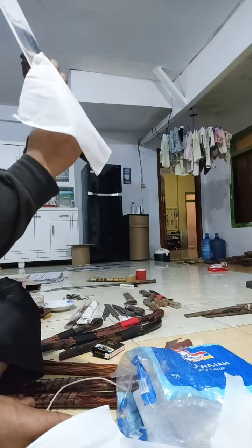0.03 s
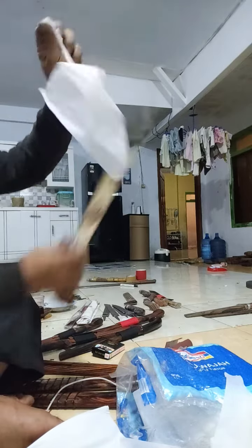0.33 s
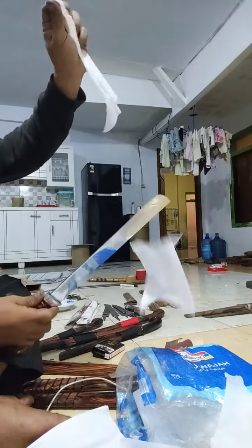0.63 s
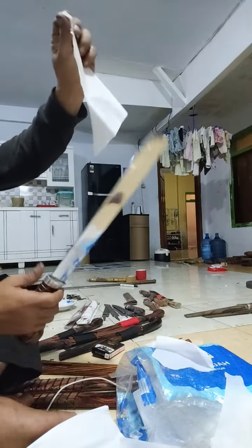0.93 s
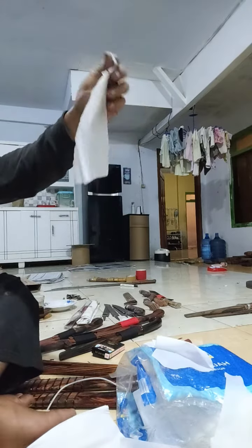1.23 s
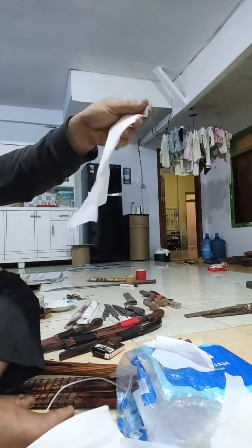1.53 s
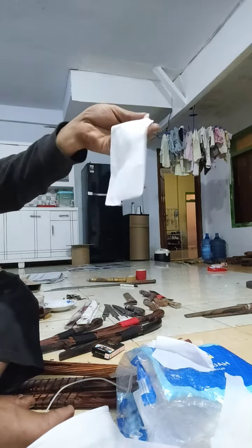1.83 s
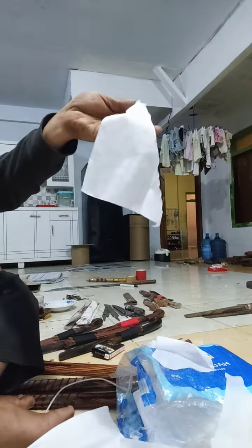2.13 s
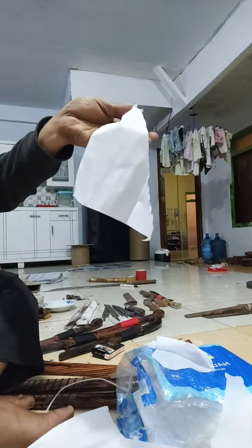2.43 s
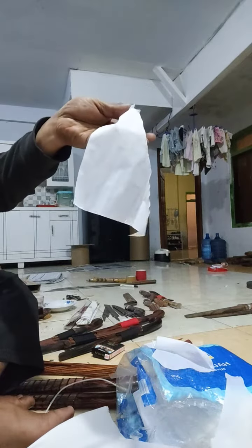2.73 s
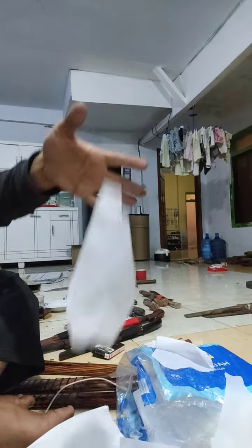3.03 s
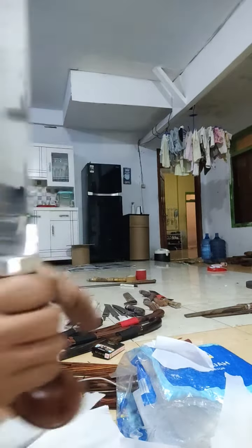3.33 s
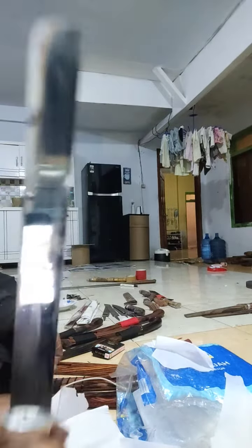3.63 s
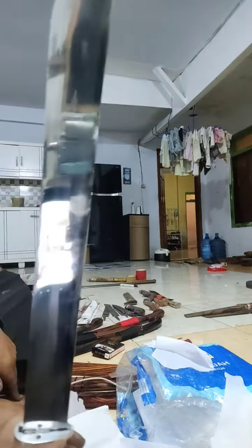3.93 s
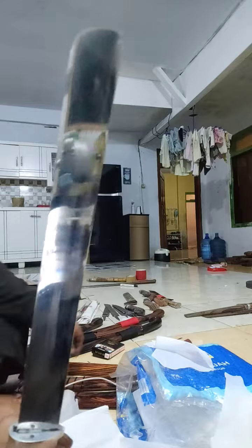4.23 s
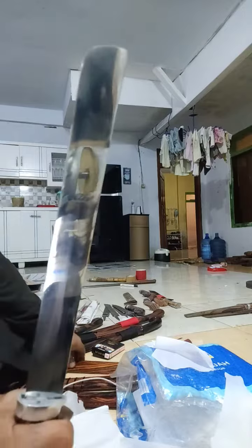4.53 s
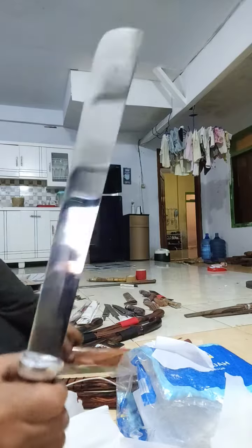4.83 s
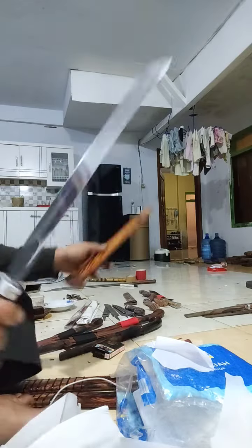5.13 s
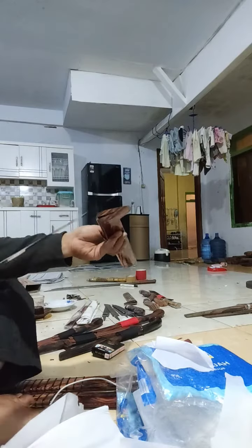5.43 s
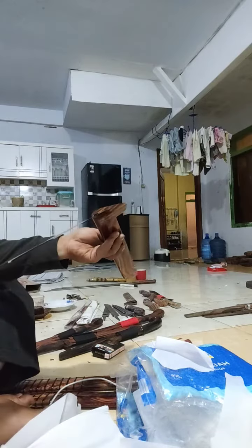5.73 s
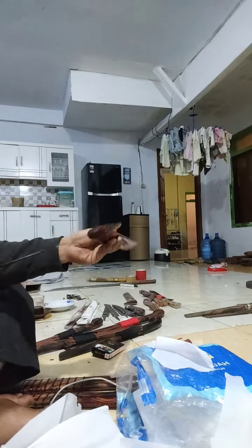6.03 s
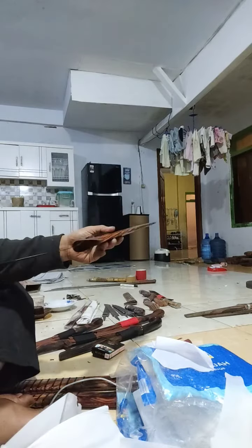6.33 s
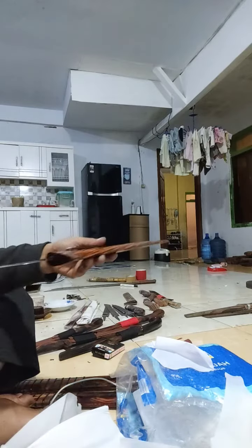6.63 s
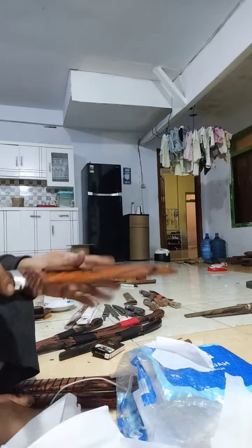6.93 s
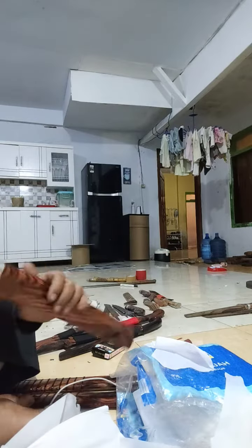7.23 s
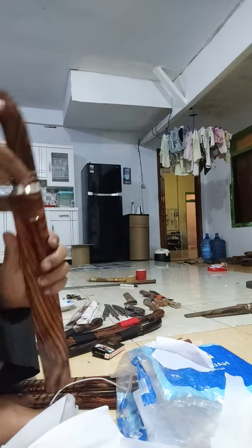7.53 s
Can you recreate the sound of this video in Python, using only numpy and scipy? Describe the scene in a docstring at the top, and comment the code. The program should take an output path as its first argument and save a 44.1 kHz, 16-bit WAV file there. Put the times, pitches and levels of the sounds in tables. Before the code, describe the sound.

A fan hums quietly throughout in a tiled room. At about 0.3 seconds a long knife slices through soft paper with a short, crisp swish, close by. The loose sheet gives faint flicks near 0.6, 0.8, 1.5 and 3.3 seconds, while a sleeve rustles softly, swelling a little between 3.8 and 5 seconds. Hands bump a wooden sheath with dull knocks at about 4.5, 5 and 5.2 seconds, followed by a very faint, thin squeak. From 5.7 seconds the steel blade taps the sheath's mouth with dry, light ticks that come closer together as it rasps inside from about 6.4 seconds. At 6.8 seconds the hilt seats with one sharp wooden clack, by far the loudest sound, echoing for about half a second. A few faint ticks and a soft bump follow between 7.2 and 7.6 seconds.

```python
"""Cutting paper and sheathing a knife

A long knife slices a hanging sheet of soft paper, snapping its fibres, while a sleeve rustles.
Hands bump the wooden sheath; the steel taps at its mouth, rasps in and seats with a sharp clack
that rings the wood. A tiled room echoes it all, and a fan hums in the background."""
import sys
import numpy as np
from scipy import signal
from scipy.fft import rfft, irfft
from scipy.io import wavfile
from scipy.ndimage import uniform_filter1d

SR = 44100
rng = np.random.default_rng(int(sys.argv[2]) if len(sys.argv) > 2 else 0)


def put_to_file(sound):
    """Save the sound as 16-bit audio at rate SR, in the file named by the first command-line argument."""
    columns = np.atleast_2d(sound).T  # one column per channel
    safe = np.clip(columns, -1, 1)
    whole_steps = np.round(safe * 32767)
    wavfile.write(sys.argv[1], SR, whole_steps.astype(np.int16))


N = 343980
T = np.arange(N) / SR

# light knocks of steel on wood: t/s, level/dB, f/Hz, tick level relative to the knock/dB
TAP_HITS = [(5.6685, -25, 2040, 2.5), (5.6700, -23, 1690, -11), (5.6725, -24.5, 1300, -5),
            (5.9287, -24, 1650, -6), (6.318, -25.5, 1550, -5.5), (6.424, -29.5, 1980, -7),
            (6.435, -30.5, 1100, -22), (6.565, -31.5, 1620, -1), (6.573, -29.5, 1190, -4),
            (6.669, -29.5, 1860, -12), (6.728, -29, 1140, -20.5), (6.752, -31.5, 2360, -1.5),
            (6.783, -33.5, 2730, 2.5), (7.178, -44.5, 7560, 13), (7.467, -32.5, 957, -14),
            (7.477, -34, 1950, -12), (7.532, -37, 1290, -8)]


def undb(db):
    """Turn decibels into a gain."""
    return 10 ** (np.asarray(db) / 20)


def unit(x):
    """Scale a sound to an average (rms) level of 1."""
    return x / np.sqrt(np.mean(x ** 2))


def panned(pan_db):
    """Left and right gains; the left is pan_db louder."""
    return undb(np.array([[pan_db], [-pan_db]]) / 2)


def add(out, s, x):
    """Mix x into out, starting at s seconds."""
    i = int(s * SR)
    out[..., i:i + x.shape[-1]] += x[..., :out.shape[-1] - i]


def curve(rows):
    """A gain that follows rows of t/s, level/dB and is zero outside them."""
    s, db = np.transpose(rows)
    return undb(np.interp(T, s, db)) * (T >= s[0]) * (T <= s[-1])


def stroke(start_s, end_s, attack_s, release_s):
    """Gain of one movement: grows until start_s, holds at 1, dies away after end_s."""
    return np.exp(-np.maximum(start_s - T, 0) / attack_s - np.maximum(T - end_s, 0) / release_s)


def swell(s, width_s):
    """A bell-shaped gain that reaches 1 at s seconds."""
    return np.exp(-((T - s) / width_s) ** 2 / 2)


def decay(t, t60):
    """A fade that drops 60 dB every t60 seconds."""
    return np.exp(-np.log(1000) * t / t60)


def walk(rate):
    """A smooth random wander of size about 1, with rate turns a second."""
    hold = int(SR / rate)
    steps = np.repeat(rng.standard_normal(N // hold + 1), hold)
    return unit(uniform_filter1d(steps, hold)[:N])


def convolve(x, response):
    """Give every sample of x the same ring or echo."""
    return signal.fftconvolve(np.atleast_2d(x), np.atleast_2d(response), axes=1)[:, :x.shape[-1]]


def band(x, kind, hz, order=2):
    """Keep the "low" or the "high" side of a frequency."""
    return signal.sosfilt(signal.butter(order, hz, kind, fs=SR, output="sos"), x)


def colour(x, points, size=4096):
    """Shape the tone along points of f/Hz, level/dB."""
    hz, db = np.transpose(points)
    f = np.maximum(np.fft.rfftfreq(size, 1 / SR), 1)
    gain = undb(np.interp(np.log(f), np.log(hz), db))
    cepstrum = irfft(np.log(gain))
    cepstrum[1:size // 2] *= 2  # folded forward so the filter never rings ahead of the sound
    cepstrum[size // 2 + 1:] = 0
    return convolve(x, irfft(np.exp(rfft(cepstrum))))


def resonance(x, hz, width_hz):
    """Keep a narrow band around one pitch."""
    return signal.lfilter(*signal.iirpeak(hz, hz / width_hz, fs=SR), x)


def diffuse(size, apart_hz=900):
    """Noise from all around: left and right share the bass but not the treble."""
    alike = 0.96 * np.exp(-(np.fft.rfftfreq(size, 1 / SR) / apart_hz) ** 2)
    mid, side = rfft(rng.standard_normal((2, size))) * np.sqrt([1 + alike, 1 - alike]) / np.sqrt(2)
    return irfft([mid + side, mid - side], size)


def grains(rate, spread_db, shared):
    """Tiny snaps of uneven size, partly shared by left and right."""
    snaps = (rng.random((3, N)) < rate / SR) * rng.standard_normal((3, N))
    snaps *= undb(spread_db * rng.standard_normal((3, N)))
    return np.sqrt(shared) * snaps[2] + np.sqrt(1 - shared) * snaps[:2]


def knock(hz, t60):
    """One fading note with an energy of 1."""
    t = T[:SR // 10]
    ring = np.sin(2 * np.pi * hz * t) * decay(t, t60) * (1 - np.exp(-2 * hz * t))
    return ring / np.linalg.norm(ring)


def fan(shaft_hz=75.13, rush_db=-56.5):
    """Spinning blades hum, air rushes, and its swirls make the room boom."""
    # blade tones: multiple of the shaft rate, level/dB
    blade_tones = [(3, -56), (5, -72), (6, -70), (8, -74.5), (9, -72.5), (14, -80.5), (30, -78.5)]
    # a fainter second hum: f/Hz, level/dB
    faint_tones = [(543.7, -82.5), (726.7, -84)]
    # low notes of the room: f/Hz, half-width of each filter/Hz, level before the draught/dB
    room_notes = [(141.3, 4.7, -66), (172.2, 10, -63.5)]
    # the draught raises and lowers the boom: t/s, gain/dB
    draught = [(0, 4.5), (1.8, 3), (2.4, -2.5), (5, -1), (6, -8), (7.8, 1)]
    # tone of rushing air: f/Hz, level/dB
    air_tone = [(18, -70), (30, -44), (107, -11.5), (136, -2), (195, -9), (228, -7.5), (253, -11),
                (374, -13.5), (404, -18), (448, -16.5), (1030, -24), (1110, -26), (2310, -24.5),
                (4780, -35.5), (15000, -41.5)]
    turns = np.cumsum(shaft_hz * (1 + 0.00099 * walk(3))) / SR
    hum = np.zeros(N)
    for k, db in blade_tones:
        hum += undb(db + .5 * walk(5)) * np.sqrt(2) * np.sin(2 * np.pi * (k * turns + rng.random()))
    for hz, db in faint_tones:
        hum += undb(db) * np.sqrt(2) * np.sin(2 * np.pi * hz * T)
    noise = diffuse(N)
    boom = 0
    for hz, half_width, db in room_notes:
        note = resonance(noise, hz, 2 * half_width)
        boom += undb(db) * unit(resonance(note, hz, 2 * half_width))
    # two soft, narrow peaks colour the steady background hiss
    hiss_peaks = unit(resonance(noise, hz=2274, width_hz=130)) * undb(-71)
    hiss_peaks += unit(resonance(noise, hz=1040, width_hz=90)) * undb(-77.5)
    rush = unit(colour(diffuse(N), air_tone)) * undb(rush_db + 0.087 * walk(1.8))
    return hum + boom * curve(draught) + rush + hiss_peaks


def rustle(steady_db=-67):
    """Paper, sleeve and palm brush softly all the time, swelling with each movement."""
    # arm movements: t/s, level/dB, half-width/s
    brushes = [(.02, -64, .06), (2.98, -70, 0.052), (3.83, -65, 0.14), (4.22, -65, 0.12),
               (4.72, -59.5, 0.075), (4.95, -67, .15), (7.6, -71.5, .1)]
    # tone of rubbing cloth: f/Hz, level/dB
    cloth_tone = [(400, -2.5), (1200, -7), (2400, 1), (4500, -9.5), (7000, -10), (10000, -17), (15000, -13)]
    power = undb(steady_db) ** 2 + sum((undb(db) * swell(s, width)) ** 2 for s, db, width in brushes)
    rubbing = colour(grains(rate=7000, spread_db=2.5, shared=.2), cloth_tone)
    return unit(rubbing) * np.sqrt(power) * panned(0.37)


def paper_cut(start_s=0.23, end_s=0.35, cut_db=-50.5, flutter_db=-57):
    """Fibres snap by the thousand as the edge runs through the sheet, which flutters around the cut."""
    # tone of snapping paper: f/Hz, level/dB
    paper_tone = [(300, -8), (700, -3), (1200, -8.5), (1900, -0.5), (2600, -3.5), (4000, -3.5), (5500, -7),
                  (6700, -4.5), (8500, -12), (11000, -11.5), (14000, -7.5), (15500, -11.5)]
    fibres = grains(rate=9000, spread_db=0, shared=0.2) * undb(1.5 * walk(123))
    cutting = undb(cut_db) * stroke(start_s, end_s, attack_s=0.026, release_s=0.007)
    flutter = undb(flutter_db) * swell((start_s + end_s) / 2, width_s=0.11)
    return unit(colour(fibres, paper_tone)) * np.hypot(cutting, flutter) * panned(0.84)


def paper_flicks():
    """The loose sheet flexes and settles in short bright whispers."""
    # flicks of the sheet: t/s, level/dB, half-width/s
    flicks = [(0.59, -57.5, 0.013), (0.797, -66, .012), (1.547, -68, .025), (3.302, -61.5, 0.016)]
    # tone of flexing paper: f/Hz, level/dB
    flick_tone = [(500, 4), (2500, 2), (4500, -3), (6500, 2), (9000, -9), (14000, -0.5)]
    flexing = sum(undb(db) * swell(s, width) for s, db, width in flicks)
    crinkle = colour(grains(rate=1400, spread_db=2.5, shared=.3), flick_tone)
    return unit(crinkle) * flexing * panned(2)


def hand_bumps(t60=0.0094):
    """A hand picks up and grips the sheath; soft flesh stops each knock almost at once."""
    # dull knocks: t/s, level/dB, f/Hz
    bumps = [(4.504, -24.5, 720), (4.516, -34, 1290), (4.996, -20, 420), (5.007, -20, 410),
             (5.012, -31, 780), (5.018, -23.5, 565), (5.152, -24, 384), (7.531, -29, 684)]
    out = np.zeros(N)
    for s, db, hz in bumps:
        add(out, s, undb(db) * knock(hz, t60))
    return out * panned(1.3)


def squeak(middle_s=5.355, half_s=0.135, top_hz=12800, sag_hz_per_s=19000):
    """A very faint, thin squeak rises and falls as the sheath is lifted."""
    away_s = np.minimum(np.abs(T - middle_s), half_s)
    pitch = (top_hz - sag_hz_per_s * away_s) * (1 + .004 * walk(300))
    gain = undb(-76) * (1 - (away_s / half_s) ** 2)
    return np.sin(2 * np.pi * np.cumsum(pitch) / SR) * gain


def blade_taps(wood_t60=0.0097, tick_t60=0.0079, steel_db=-11):
    """The blade knocks on the sheath's mouth and walls: each time a dry note with a steely tick."""
    # tone of the tick: f/Hz, level/dB
    tick_tone = [(500, 3.5), (2000, 6), (3300, 0.5), (6000, -8), (9000, -11.5), (15000, -19)]
    out, t = np.zeros((2, N)), T[:SR // 10]
    steel = undb(steel_db) * (knock(hz=4850, t60=0.06) + 0.39 * knock(hz=5800, t60=0.069))
    for s, db, hz, tick_db in TAP_HITS:
        tick = colour(rng.standard_normal((2, len(t))) * decay(t, tick_t60), tick_tone)
        tick /= np.linalg.norm(tick[0])
        add(out, s, undb(db) * (knock(hz, wood_t60) + undb(tick_db) * (tick + steel)))
    return out * panned(4.2)


def sheath_rasp(slide_db=-55, press_db=-3.5):
    """Steel catches and slips on wood in uneven surges, rubbing harder wherever it knocks a wall."""
    # tone of steel rubbing wood: f/Hz, level/dB
    rasp_tone = [(400, -6), (700, -3.5), (1100, -1.5), (1400, -6), (1700, -1), (2000, -8.5), (2400, -1.5),
                 (3000, -7.5), (4000, -6), (5200, -6), (6600, -4.5), (8100, -12), (10000, -11),
                 (15000, -6.5)]
    slips = colour(grains(rate=2600, spread_db=2, shared=0.21), rasp_tone)
    wood = band(slips, "low", hz=4500)
    hiss = slips - wood
    surging = wood * undb(5.1 * walk(78)) + hiss * undb(1.8 * walk(130))
    speed = stroke(start_s=6.55, end_s=6.76, attack_s=0.07, release_s=0.11)
    pressure = 1 + undb(press_db) * sum(swell(s, width_s=0.0068) for s, *_ in TAP_HITS)
    return unit(surging) * speed * pressure * undb(slide_db) * panned(2.4)


def clack_notes(left_lag_rad=1.06):
    """Short wooden notes of the sheath, and faint pitches that linger in the echo after the clack."""
    # wooden notes, then four lingering pitches: f/Hz, time to fade 60 dB/s, energy/dB, left minus right/dB
    notes = [(281, 0.015, -18, -1.5), (415, .025, -33.5, -0.5), (770, 0.015, -13, 0.5),
             (967, 0.025, -17, 0), (1076, 0.057, -11, -9), (1250, .02, -18.5, 2), (1640, 0.025, -1, 5.5),
             (2124, 0.032, -11.5, 2.5), (2336, 0.023, -4, -0.5), (2653, 0.032, -7.5, 2),
             (3034, 0.017, -12.5, -10), (3380, 0.025, -19, 3), (4000, 0.015, -2, -6), (6230, .008, -8, 3),
             (7910, 0.0068, -15.5, -7), (1130, .4, -21, -2), (1544, 0.55, -17.5, -5),
             (2140, 0.45, -18.5, -6.5), (2500, .4, -19.5, 2.5)]
    t = T[:SR // 2]
    phase = np.array([[-left_lag_rad], [left_lag_rad]]) / 2  # the right side hears each swing first
    ring = 0
    for hz, t60, db, pan_db in notes:
        note = np.cos(2 * np.pi * hz * t + phase) * decay(t, t60) * (1 - np.exp(-2 * hz * t))
        ring += undb(db) * panned(pan_db) * note / np.linalg.norm(note[0])
        ring = -ring  # neighbouring notes swing in opposite directions
    return ring


def sheath_clack(crack_t60=0.0075, directions=4):
    """The hilt slams home in a quick stutter; each contact rings the wood and throws off a crack."""
    # hilt striking the sheath mouth: t/s, blow level/dB, contact time/ms, crack level/dB
    contacts = [(6.8337, -0.5, 0.046, -16), (6.8346, 8, 0.059, 6.5), (6.8357, -9.5, 0.23, -11.5)]
    # tone of the crack: f/Hz, level/dB
    crack_tone = [(200, -7.5), (600, -4), (1000, -3), (1900, -7), (3000, -3.5), (4000, 4), (5200, 4),
                  (6500, 3.5), (8000, -3.5), (9700, -5.5), (12500, -9.5), (14000, -7), (15500, -9)]
    start_s, t = contacts[0][0], T[:SR]
    force, burst = np.zeros(SR), np.zeros(SR)
    fade = decay(t, crack_t60)
    for s, db, contact_ms, crack_db in contacts:
        push = (t + 1 / SR) * np.exp(-2 * np.pi * t * 1000 / contact_ms)
        add(force, s - start_s, undb(db) * push / push.sum())
        add(burst, s - start_s, undb(crack_db) * fade / np.linalg.norm(fade))
    ring = convolve(force, clack_notes())
    crack = colour(rng.standard_normal((2, SR)) * burst, crack_tone) * panned(9.1)
    scattered = 0
    for _ in range(directions):  # the crack leaves differently each way, so its echo is smooth
        outgoing = colour(rng.standard_normal(SR) * burst, crack_tone)
        scattered += reverb(outgoing[0]) / np.sqrt(directions)
    out = np.zeros((2, N))
    add(out, start_s, echoes(ring + crack) + reverb(ring[0]) * undb(1) + scattered * undb(6.5))
    return out


def echoes(x):
    """The direct sound plus its first bounces off ceiling and walls."""
    # bounces: delay/s, left level/dB, right level/dB
    bounces = [(.0096, -9.5, -9), (0.0151, -8, -28.5), (0.024, -17.5, -11.5)]
    out = x.copy()
    for delay_s, left_db, right_db in bounces:
        add(out, delay_s, x * undb([[left_db], [right_db]]))
    return out


def reverb(x, low_t60=0.62, high_t60=0.5, split_hz=3200, build_s=0.0035):
    """Countless bounces off tiles and plaster blur into a tail whose treble fades first."""
    # tone of the room's tail: f/Hz, level/dB
    tile_tone = [(200, -3.5), (1000, -1), (1600, -3), (1900, 3.5), (2400, 2.5), (3200, 3.5), (4000, -1),
                 (5000, -5.5), (6300, -9.5), (7200, -4.5), (10000, -4), (15000, -6.5)]
    t, noise = T[:SR], diffuse(SR)
    low = band(noise, "low", split_hz, order=3) * decay(t, low_t60)
    high = band(noise, "high", split_hz, order=3) * decay(t, high_t60)
    tail = (low + high) * (1 - np.exp(-(t / build_s) ** 2))
    tail = colour(tail / np.linalg.norm(tail[0]), tile_tone)
    return convolve(x, tail) * undb(-3) * panned(2)


def scene():
    """Paper, hands, knife and sheath sound through the room, over the fan."""
    # the right microphone's duller tone: f/Hz, level/dB
    right_tone = [(5000, -2.5), (10500, -0.5), (12500, -4.5), (15000, -12.5)]
    handling = paper_cut() + paper_flicks() + rustle() + squeak()
    handling += sheath_rasp() + blade_taps() + hand_bumps()
    heard = echoes(handling) + reverb(handling[0]) + sheath_clack()
    left, right = band(heard, "high", hz=170)  # the handled sounds and their echoes carry no deep bass
    return np.vstack([left, colour(right, right_tone)]) + fan()


def record(dry):
    """Round off the loudest peak and cut the highest treble."""
    ceiling, top_hz = 0.7, 15600
    rounded = ceiling * np.tanh(dry / ceiling)
    return signal.sosfilt(signal.ellip(10, .2, 80, top_hz, fs=SR, output="sos"), rounded)


dry = scene()
out = record(dry)
put_to_file(out)
```